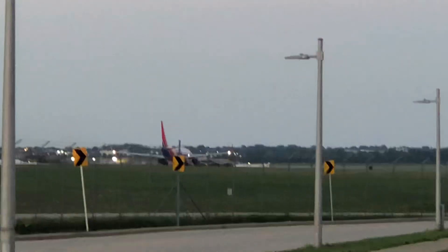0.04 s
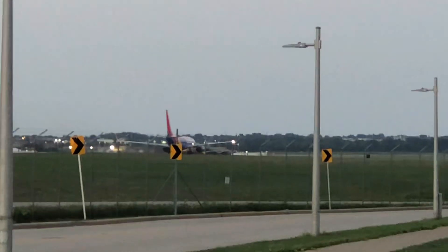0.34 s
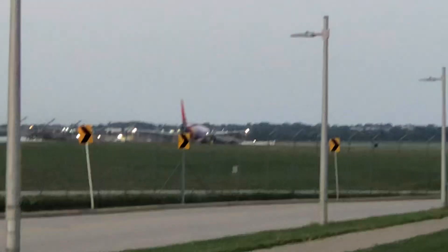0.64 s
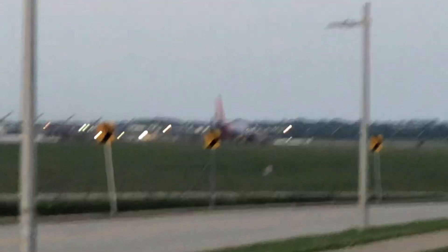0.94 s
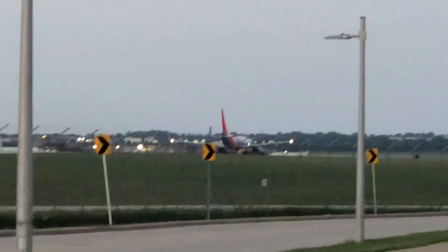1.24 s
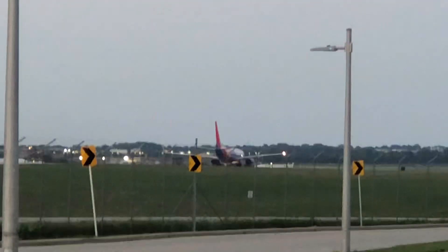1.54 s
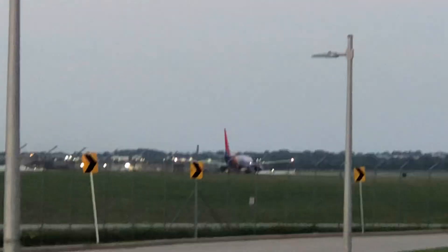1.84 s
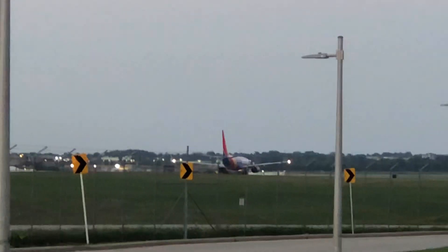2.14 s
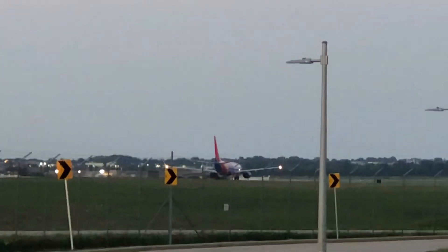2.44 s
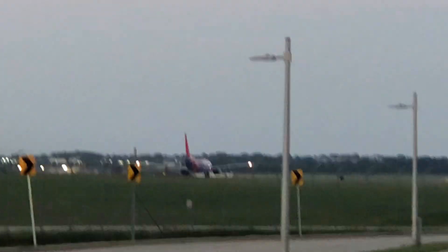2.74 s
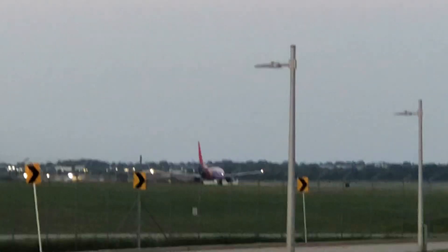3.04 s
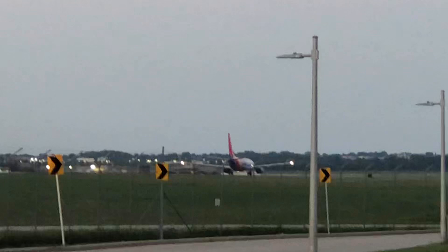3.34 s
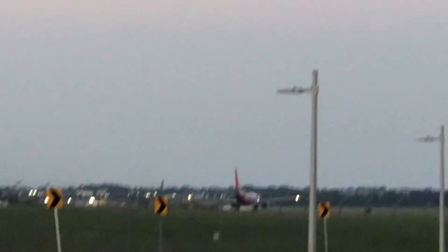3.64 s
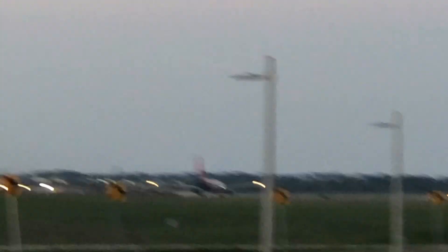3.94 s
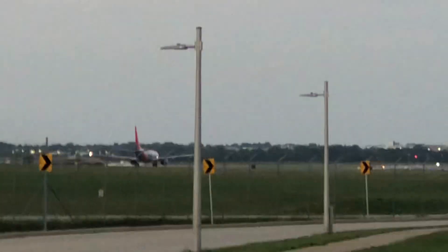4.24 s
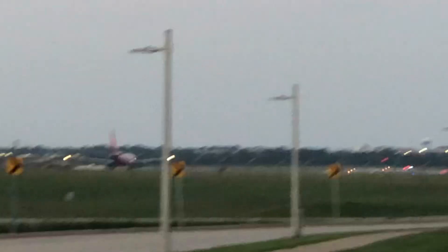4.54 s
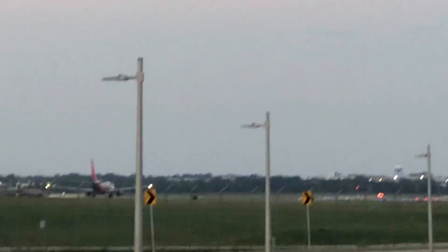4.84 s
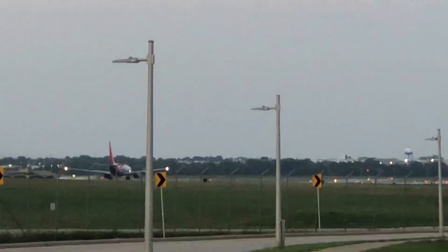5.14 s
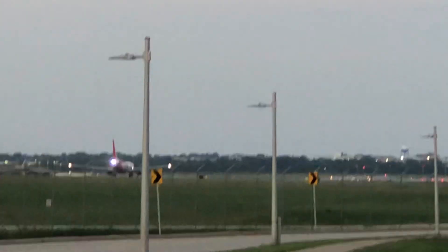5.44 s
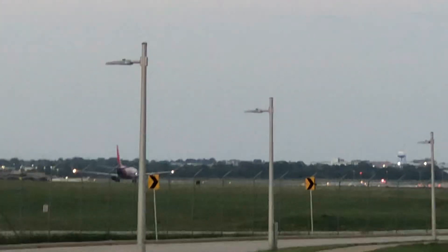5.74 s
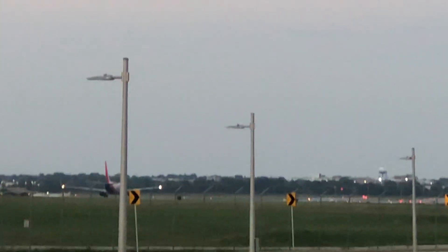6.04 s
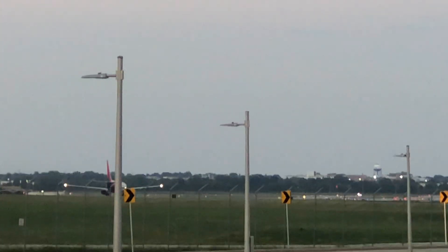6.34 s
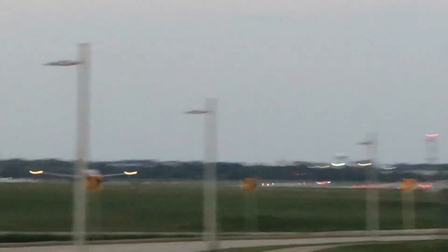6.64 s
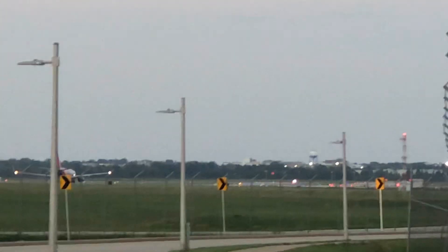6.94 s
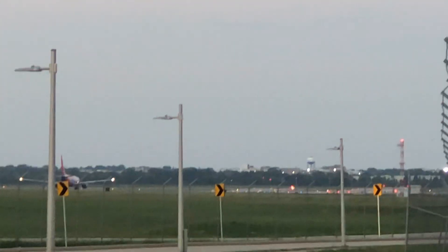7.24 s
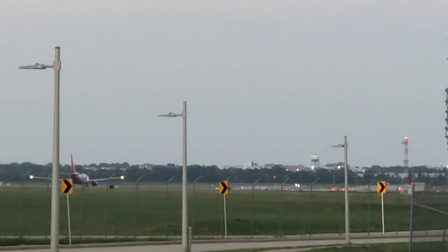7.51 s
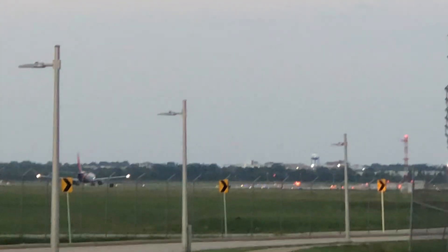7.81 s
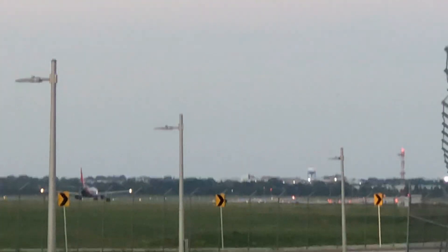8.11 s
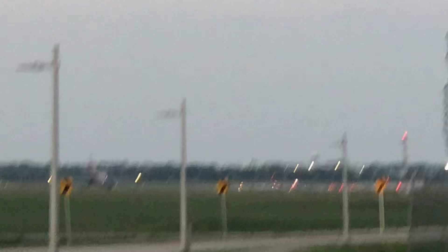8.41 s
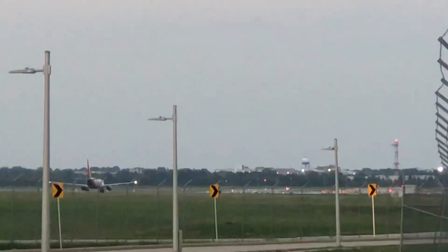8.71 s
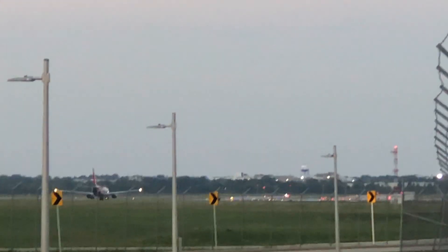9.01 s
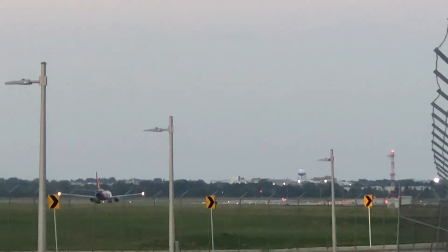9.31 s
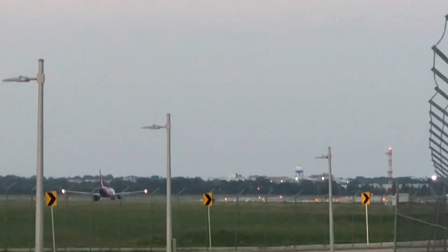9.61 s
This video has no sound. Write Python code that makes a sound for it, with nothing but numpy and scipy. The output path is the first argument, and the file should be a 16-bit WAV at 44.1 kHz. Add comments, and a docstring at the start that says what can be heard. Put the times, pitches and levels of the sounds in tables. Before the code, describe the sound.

A distant airliner rumbles and whines as it taxis away, while crickets trill nearby, with a brief cloth rustle and a tap.

```python
"""An airliner taxis away across an airfield at dusk: the rumble and roar of its exhaust and the hazy whine of
its fans fade with distance. In the grass nearby, tree and ground crickets trill and other insects chirp. Each
wing stroke draws a file over a scraper and makes a short falling whistle. Close by, a shoe gives one brushing
scuff, and later there is a small tap."""
import sys
import numpy as np
from scipy import signal
from scipy.fft import rfft, irfft, next_fast_len
from scipy.io import wavfile
from scipy.ndimage import uniform_filter1d, map_coordinates

SR = 44100
rng = np.random.default_rng(int(sys.argv[2]) if len(sys.argv) > 2 else 0)


def unload_wav(signal):
    """Save mono or channel-first audio to the path in sys.argv[1] as 16-bit WAV at rate SR, clipped to [-1, 1]."""
    wavfile.write(
        sys.argv[1],
        SR,
        np.round(np.clip(np.atleast_2d(signal).T, -1, 1) * 32767).astype(np.int16),
    )


N = 435266
T = np.arange(N) / SR

# the tone colours of four engine noises, deepest first: (frequency [Hz], relative level [dB])
RUMBLE_SPECTRUM = [(18, -46), (30, -25), (43, -4.5), (61, 0), (77, -2.5), (98, -15), (140, -27.5),
                   (300, -55)]
LOW_ROAR_SPECTRUM = [(70, -14.5), (115, 0.5), (160, -1), (200, -1.5), (240, -8), (290, -10.5), (370, -18),
                     (600, -43)]
ROAR_SPECTRUM = [(150, -5), (300, -3), (390, -3.5), (490, 2), (640, -1.5), (900, 0), (1130, -3),
                 (1370, -17), (2000, -16), (3500, -39.5)]
HISS_SPECTRUM = [(700, -10), (1400, 0), (1700, 0), (2300, -0.5), (3150, -4.5), (3400, -6), (3750, -22),
                 (4800, -11), (6300, -21.5), (8500, -49)]
# how loud the exhaust rumbles: (time [s], level [dB])
RUMBLE_LOUDNESS = [(0, -31.5), (1.3, -34.5), (3.4, -35.5), (4.2, -39.5), (5.4, -39), (6.1, -37.5),
                   (8.2, -40), (9.87, -40)]
# fan and turbine tones, each flaring once as its beam points at the listener: (pitch [Hz], width [Hz],
# base level [dB], fade [dB/s], flare time [s], flare boost [dB], time the beam turns away [s])
FAN_WHINES = [(1194, 114, -55, 0.45, 5.54, 1.5, 6.2), (1926, 103, -58.5, 1.5, 1.4, 4, 17),
              (2656, 146, -61, 1.6, .5, 1, 12), (3123, 155, -61.5, 1.25, .1, 3, 5.9),
              (3584, 82, -67.5, 2, .2, 2.5, 6.5), (3920, 110, -67, 2.85, 5.24, 12.5, 14),
              (4190, 77, -73.5, 2.0, .3, 5.5, 5.9)]
# the fans beam their sound unevenly as the aircraft turns: (time [s], gain at BEAM_HZ [dB])
FAN_BEAM = [(0, 0), (1, 0.5), (2, -2), (3.3, 4.5), (4.2, -0.5), (5.3, -1), (9.87, 0.5)]
BEAM_HZ = 1990
# swells of one narrow fan tone: (time [s], half length [s], level [dB])
FAN_TONE_SWELLS = [(.6, 1.4, -62.5), (3.6, 1.34, -61), (8.9, 1.9, -66.5)]
# bouts of the nearest crickets: (end [s], length [s], pace [strokes/s], pitch [Hz],
# pitch fall in a stroke [share], first level [dB], last level [dB], final slowing [share])
TRILL_BOUTS = [(2.08, 3, 73.5, 5600, .12, -62.5, -61, .16), (6.3, 2.7, 73.5, 5560, .13, -68, -63, .13),
               (7.9, 2.9, 75, 5620, .11, -67, -67, .2), (9.9, 2.1, 77.5, 5560, .12, -68, -67, .22),
               (10.5, 2.7, 48.7, 6960, .06, -77, -66.5, 0)]
# runs of short high buzzes: (first [s], last [s], rough spacing [s], top pitch [Hz], level [dB])
BUZZ_RUNS = [(.22, 3.22, .5, 7850, -75), (4.85, 8.65, .42, 7810, -76), (9.11, 9.6, .49, 7870, -76),
             (.15, 4.78, .515, 7290, -73), (5.68, 7.48, .6, 7230, -72), (.47, 2.87, .4, 6870, -75),
             (4.38, 8.8, .74, 6830, -73)]
# runs of a field cricket's chirps: (first [s], last [s], rough spacing [s], base level [dB])
CHIRP_RUNS = [(.09, 3.3, .58, -73), (4, 4, .58, -69), (6.16, 9.63, .58, -68.5)]
# the tone colour of the scuffing shoe: (frequency [Hz], relative level [dB])
SCUFF_SPECTRUM = [(1000, -20), (2800, 9.5), (4500, 4), (6300, 3), (9000, -1.5), (11500, -10), (13500, -8),
                  (15800, -24)]
# strokes of the scuffing shoe: (time [s], half length [s], level [dB])
SCUFF_STROKES = [(3.312, 0.076, -57.5), (3.432, 0.093, -53), (3.556, 0.093, -53), (3.756, 0.18, -64.5),
                 (4.08, 0.13, -69)]
# sharp crackles within the scuff: (time [s], level [dB])
SCUFF_CRACKLES = [(3.63, -57), (3.67, -51), (3.78, -52), (3.82, -57), (4.005, -59), (4.11, -59)]
# brief scrapes within the scuff: (time [s], pitch [Hz], width [Hz], level [dB])
SCUFF_SCRAPES = [(3.285, 2100, 1300, -48.5), (3.43, 4540, 900, -51.5)]
# the brief tones of the tap: (start [s], pitch [Hz], time to fade by 60 dB [s], level [dB])
TAP_TONES = [(5.8668, 3200, 0.0039, -30), (5.8668, 1670, 0.0065, -32), (5.8655, 8700, .005, -52),
             (5.8688, 560, 0.032, -35)]
# how loud the far crickets sing: (time [s], tree cricket level [dB], ground cricket level [dB])
CHORUS_LOUDNESS = [(0, -59, -63.5), (1.5, -71, -68.5), (3, -69, -66), (4.3, -64, -67.5), (5.4, -61, -66.5),
                   (6.8, -62.5, -65), (8, -69, -67), (9.87, -70.5, -65.5)]
# the hush of far insects and still air: (frequency [Hz], relative level [dB])
FIELD_SPECTRUM = [(300, 0.5), (3000, -1.5), (4150, -9), (4550, -2), (5200, -3.5), (6250, -11), (7300, -5),
                  (7900, -13.5), (8400, -20), (12000, -24), (15000, -25.5)]


def exhaust_rumble():
    """The exhaust makes a deep rumble and a low roar that fade as the aircraft moves away."""
    rumble = steady(noise(RUMBLE_SPECTRUM), span_s=.45) * undb(curves(RUMBLE_LOUDNESS)[0])
    low_roar = steady(noise(LOW_ROAR_SPECTRUM), span_s=.34) * undb(-45 - .54 * T)
    return rumble + low_roar


def jet_roar(start_db=-50, fade_db_per_s=.5, swing_db=3):
    """The fading roar swells once as the exhaust swings past the listener."""
    direct = noise(ROAR_SPECTRUM)
    lag_s = .00416 * (1 + .13 * walk(1.1))  # restless air shifts the delay of the reflection
    reflected = undb(-14.5) * np.interp(T - lag_s, T, direct)
    roar_db = start_db - fade_db_per_s * T + swing_db * swell(4.55, half_s=.88)
    return level(direct + reflected, 0) * undb(roar_db)


def fan_blades(hiss_db=-52.5, hiss_fade_db_per_s=1.05, leaving_db_per_s=4.5):
    """The blades hiss and whine, fading with distance; swirling air smears their tones into a haze."""
    beam_db = curves(FAN_BEAM)[0]
    out = noise(HISS_SPECTRUM) * undb(hiss_db - hiss_fade_db_per_s * T + .6 * beam_db)
    for hz, width_hz, db, fade_db_per_s, flare_s, flare_db, leaves_s in FAN_WHINES:
        # higher tones are beamed more sharply
        angle_db = beam_db * hz / BEAM_HZ + flare_db * swell(flare_s, half_s=1)
        loss_db = fade_db_per_s * T + leaving_db_per_s * np.maximum(T - leaves_s, 0)
        out += waver(haze(hz, width_hz), db=1.3, rate=9) * undb(db - loss_db + angle_db)
    return out


def fan_tone():
    """One narrow fan tone comes and goes."""
    loudness = sum(undb(db) * swell(s, half_s) for s, half_s, db in FAN_TONE_SWELLS)
    return waver(haze(hz=1409.6, width_hz=23.6), db=-.5, rate=9.4) * loudness


def wing_strokes(rate, hz, fall, duty=.7, jitter=.008):
    """Each stroke draws a file over a scraper: a whistle that falls as the wing slows."""
    cycle = np.cumsum(rate * (1 + .007 * walk(20))) / SR + rng.random()
    progress = np.minimum(cycle % 1 / duty, 1)  # duty is the share of each cycle that sounds
    pitch = hz * (1 - fall * (progress - .5) + jitter * walk(170))
    restart = rng.random(2048)[cycle.astype(int) % 2048]  # the wing rings afresh on every stroke
    phase = 2 * np.pi * (np.cumsum(pitch) / SR + restart)
    whistle = np.sin(phase) + undb(-28.5) * np.sin(2 * phase)
    return level(np.sin(np.pi * progress) * whistle, 0)


def near_trills(rise_s=.096, slowing_s=.36, stop_s=.01):
    """The nearest crickets trill in bouts; most grow louder, slow down and stop short."""
    out = np.zeros(N)
    for end, length, rate, hz, fall, first_db, last_db, slowing in TRILL_BOUTS:
        tired = np.clip(1 - (end - T) / slowing_s, 0, 1)
        gate = np.clip((T - end + length) / rise_s, 0, 1) * np.clip((end - T) / stop_s, 0, 1)
        song = wing_strokes(rate * (1 - slowing * tired ** 2), hz, fall, duty=.69)
        bout_db = np.interp(T, [end - length, end], [first_db, last_db])
        out += waver(song, db=1.7, rate=32) * gate * undb(bout_db)
    return out


def insect_buzzes(length_s=.11, arch=.045, rate=86, voices=5):
    """Insects repeat brief buzzes, highest and loudest in the middle; fainter ones join at random."""
    out = np.zeros(N)
    crowd = [(when * T[-1], 6700 + 1000 * high, -78 + 2 * loud)
             for when, high, loud in rng.random((70, 3))]
    neighbours = [(s, hz * (1 + .005 * rng.standard_normal()), db + .61 * rng.standard_normal())
                  for first_s, last_s, period_s, hz, db in BUZZ_RUNS
                  for s in beats(first_s, last_s, period_s)]
    calls = sorted(neighbours + crowd)
    for voice in range(voices):
        pitch, loudness = np.full(N, 7000.), np.zeros(N)
        for s, hz, db in calls[voice::voices]:
            on = slice(*np.searchsorted(T, [s - length_s / 2, s + length_s / 2]))
            place = (T[on] - s) / (length_s / 2)  # -1 to 1 across the buzz
            pitch[on] = hz * (1 - arch * place ** 2)
            loudness[on] = undb(db) * np.cos(np.pi / 2 * place)
        out += loudness * wing_strokes(rate * (1 + .06 * rng.standard_normal()), pitch, fall=.054)
    return out


def field_cricket(hz=4440, step_hz=70, gap_s=.04, half_s=.012, sag_hz_per_s=5000):
    """Each chirp is three short pulses that step up in level and pitch; each pulse sags slightly."""
    out = np.zeros(N)
    for first_s, last_s, period_s, db in CHIRP_RUNS:
        for s in beats(first_s, last_s, period_s):
            for k, pulse_db, stray in zip((-1, 0, 1), (-6, 2.5, 4.5), rng.standard_normal(3)):
                on = abs(T - s - k * gap_s) < gap_s
                t = T[on] - s - k * gap_s
                pitch = hz * (1 + .009 * stray) + k * step_hz - sag_hz_per_s * t / 2
                loudness = undb(db + pulse_db) * np.exp(-(t / half_s) ** 2)
                out[on] += loudness * np.sin(2 * np.pi * pitch * t)
    return out


def shoe_scuff(grain_db=2.8, snap_s=.0013, scrape_s=.016):
    """A shoe scuffs in a few quick strokes, with sharp crackles and brief scrapes."""
    hiss = rng.standard_normal(N)
    grains = undb(grain_db * rng.standard_normal(N // 32 + 1).repeat(32)[:N])
    brushing = np.linalg.norm([undb(db) * swell(s, half_s) for s, half_s, db in SCUFF_STROKES], axis=0)
    snaps = sum(undb(db) * np.exp(-abs(T - s) / snap_s) for s, db in SCUFF_CRACKLES)
    rub = level(hiss * grains, 0) * (waver(brushing, db=1, rate=77) + snaps)
    folds = sum(haze(hz, width_hz) * undb(db) * swell(s, scrape_s)
                for s, hz, width_hz, db in SCUFF_SCRAPES)
    return colour(rub, SCUFF_SPECTRUM) * rub.std() + folds


def tap(attack_s=.00022):
    """A sharp contact, then the dull knock of the body behind it."""
    out = np.zeros(N)
    for s, hz, t60, db in TAP_TONES:
        t = np.clip(T - s, 0, .3)
        loudness = undb(db) * (1 - np.exp(-t / attack_s)) * np.exp(-np.log(1000) * t / t60)
        out += loudness * np.sin(2 * np.pi * hz * t)
    return out


def cricket_chorus(hz, spread, rate, fall, count):
    """Crickets further off, each with its own pitch and pace; moving air makes them swell and sink."""
    out = np.zeros(N)
    for offset in np.linspace(-spread, spread, count):
        song = wing_strokes(rate * (1 + .1 * rng.standard_normal()), hz * (1 + offset), fall)
        out += waver(song, db=2, rate=3.14)
    return level(out, 0)


def outdoor_echo(x, t60, echo_db):
    """Grass, road and fence return a short blurred echo that fades by 60 dB in t60 seconds."""
    t = T[:SR // 2]
    tail = rng.standard_normal(len(t)) * np.exp(-np.log(1000) * t / t60)
    echo = signal.fftconvolve(x, tail / np.linalg.norm(tail))[:N]
    return (x + undb(echo_db) * echo) / np.sqrt(1 + undb(echo_db) ** 2)


def undb(db):
    """Turn decibels into a gain."""
    return 10 ** (np.asarray(db) / 20)


def level(x, db):
    """Set the average (rms) level; 0 dB means rms 1."""
    return x * undb(db) / np.sqrt(np.mean(x ** 2) + 1e-30)


def curves(rows):
    """Turn the columns of a table into signals in time."""
    s, *columns = np.transpose(rows)
    return [np.interp(T, s, column) for column in columns]


def walk(rate):
    """A smooth random curve, spread near 1, through `rate` points a second."""
    points = rng.standard_normal(2048)
    places = np.arange(0, N + 128, 128) / SR * rate
    return map_coordinates(points, [places], order=3, mode="wrap").repeat(128)[:N]


def shape(x, gain):
    """Filter by a gain that depends on frequency."""
    size = next_fast_len(N)
    hz = np.arange(size // 2 + 1) * SR / size
    return irfft(rfft(x, size) * gain(hz), size)[:N]


def colour(x, spectrum):
    """Filter by a spectrum table, rolling off above its last row; rms 1."""
    hz, db = np.transpose(spectrum)

    def gain(f):
        return undb(np.interp(np.log(f + 1), np.log(hz), db)) / (1 + (f / hz[-1] / 2) ** 4)
    return level(shape(x, gain), 0)


def noise(spectrum):
    """Noise with a given tone colour; rms 1."""
    return colour(rng.standard_normal(N), spectrum)


def haze(hz, width_hz):
    """A narrow band of noise, heard as a blurred tone; rms 1."""
    band = shape(rng.standard_normal(N), lambda f: 1 / (1 + ((f - hz) / (.83 * width_hz)) ** 4) ** .84)
    return level(band, 0)


def waver(x, db, rate):
    """Let the level rise and sink at random."""
    return x * undb(db * walk(rate))


def steady(x, span_s):
    """Even out the slow swells of a noise; rms near 1."""
    return x / np.sqrt(uniform_filter1d(x ** 2, int(span_s * SR)))


def swell(s, half_s):
    """A smooth rise and fall around a moment; top 1."""
    return np.exp(-((T - s) / half_s) ** 2)


def beats(first_s, last_s, period_s):
    """The evenly spaced moments of the calls in a run."""
    return np.linspace(first_s, last_s, round((last_s - first_s) / period_s) + 1)


def scene():
    """The far airliner behind the insects in the grass, with a scuff and a tap close by."""
    tree_db, ground_db = curves(CHORUS_LOUDNESS)
    tree = cricket_chorus(hz=2937, spread=.02, rate=55, fall=.04, count=4) * undb(tree_db)
    ground = cricket_chorus(hz=5464, spread=.045, rate=74, fall=.12, count=6) * undb(ground_db)
    far_crickets = outdoor_echo(tree + ground, t60=.39, echo_db=-8.5)
    hush = level(noise(FIELD_SPECTRUM), -65.5)
    near_insects = outdoor_echo(near_trills() + insect_buzzes() + field_cricket(), t60=.15, echo_db=-13)
    airliner = exhaust_rumble() + jet_roar() + fan_blades() + fan_tone()
    return (airliner + near_insects + shoe_scuff() + tap() + far_crickets + hush)[None]


def record(dry, top_hz=15650):
    """The sound opens without a click; the microphone cuts the highest treble."""
    fade_in = np.minimum(T / .003, 1)
    low_pass = signal.ellip(10, .2, 80, top_hz, fs=SR, output="sos")
    return signal.sosfilt(low_pass, dry * fade_in)


dry = scene()
out = record(dry)
unload_wav(out)
```